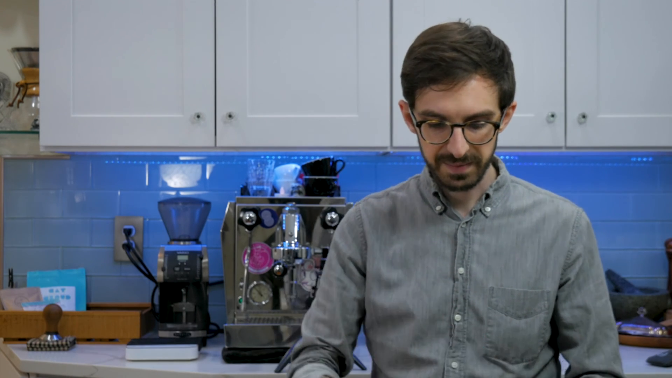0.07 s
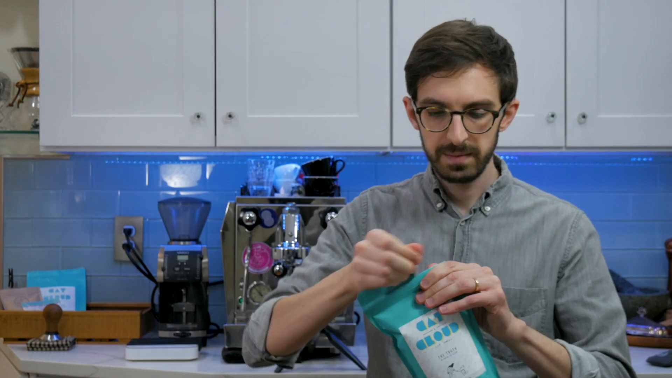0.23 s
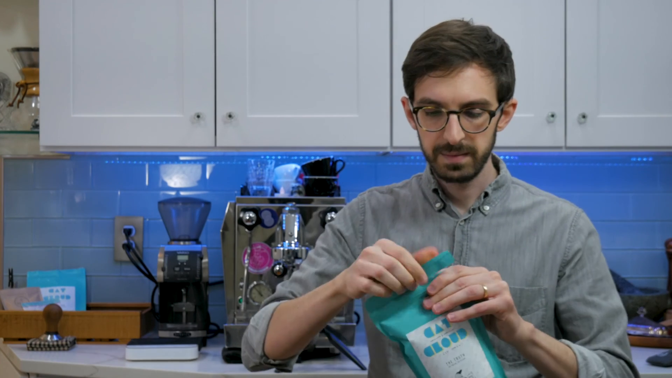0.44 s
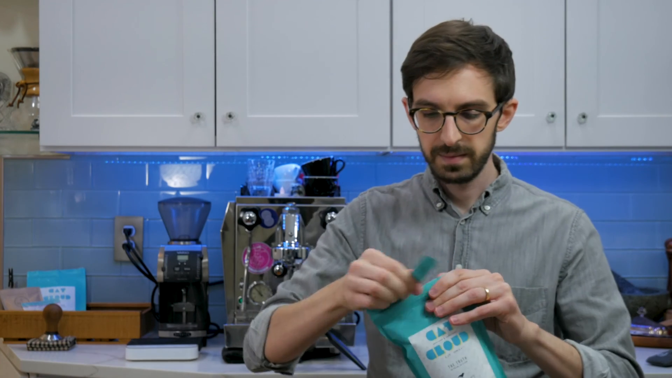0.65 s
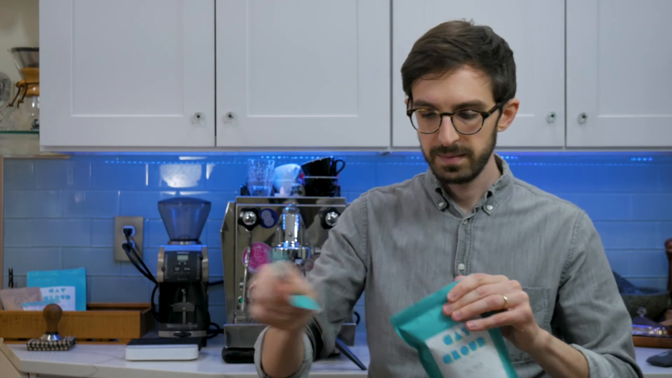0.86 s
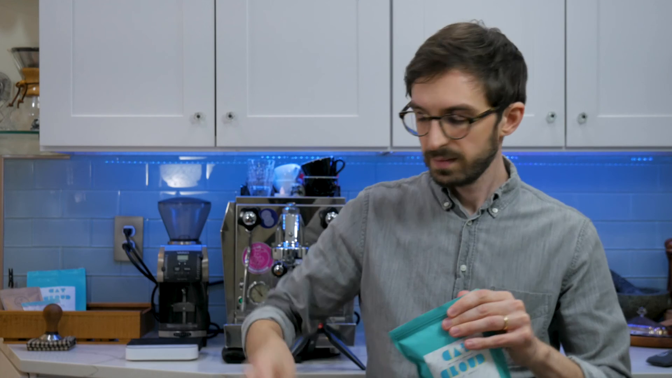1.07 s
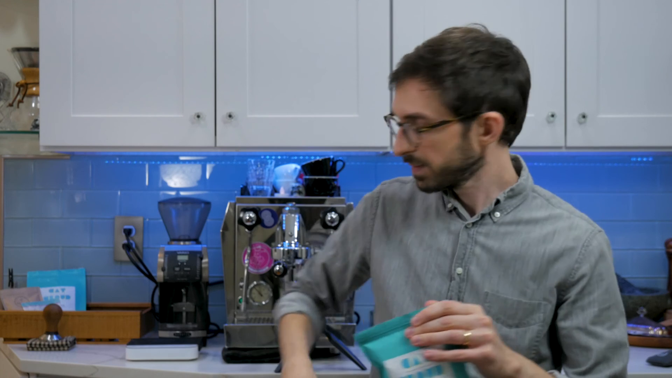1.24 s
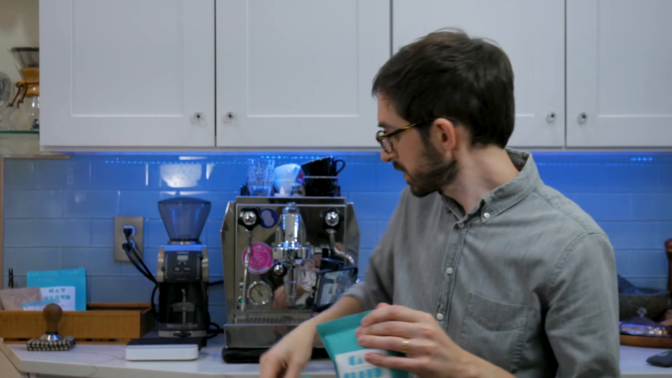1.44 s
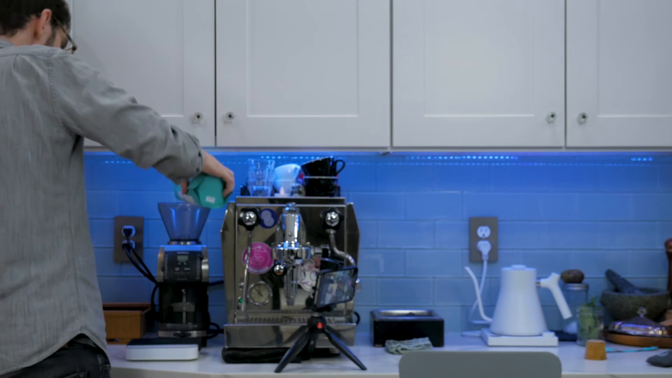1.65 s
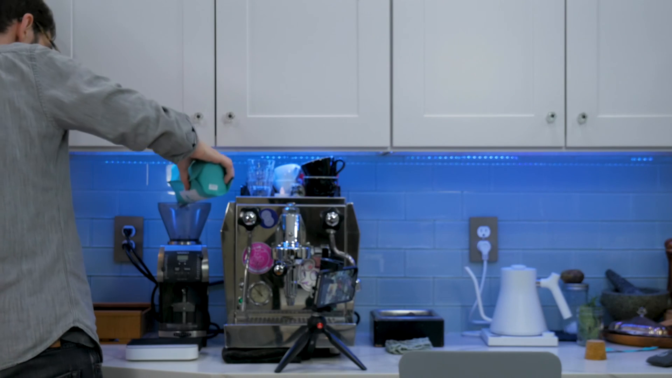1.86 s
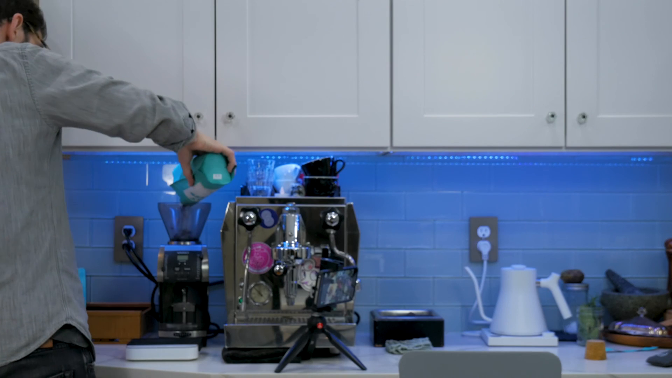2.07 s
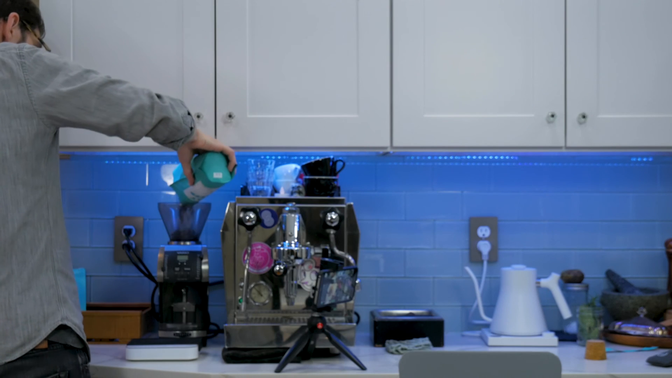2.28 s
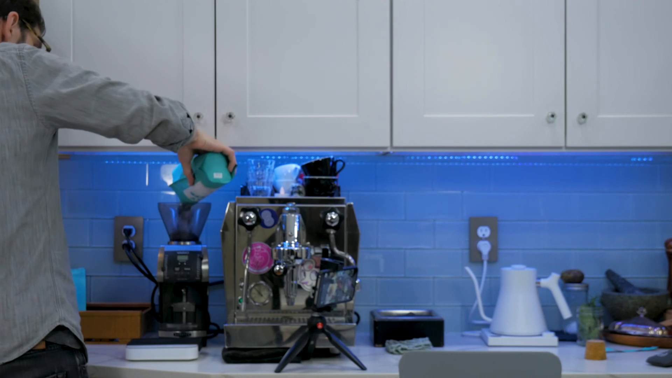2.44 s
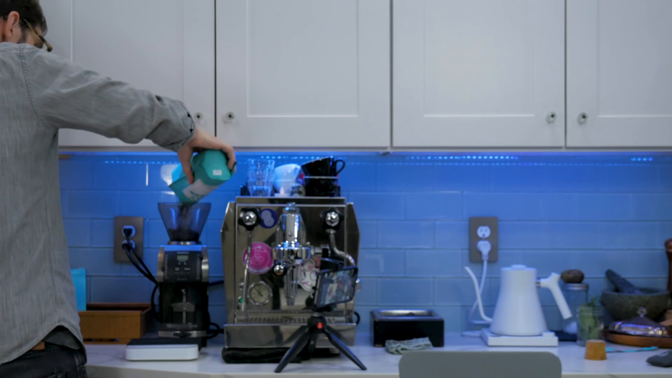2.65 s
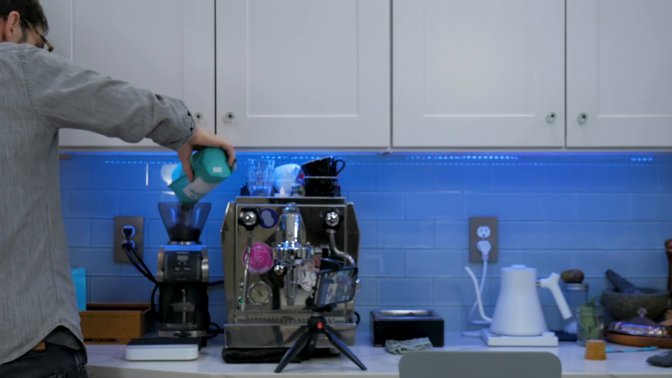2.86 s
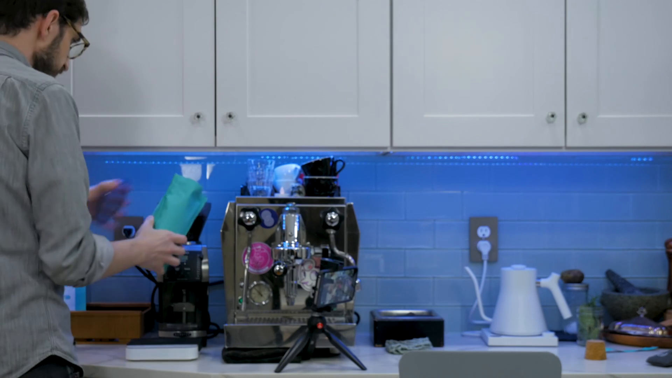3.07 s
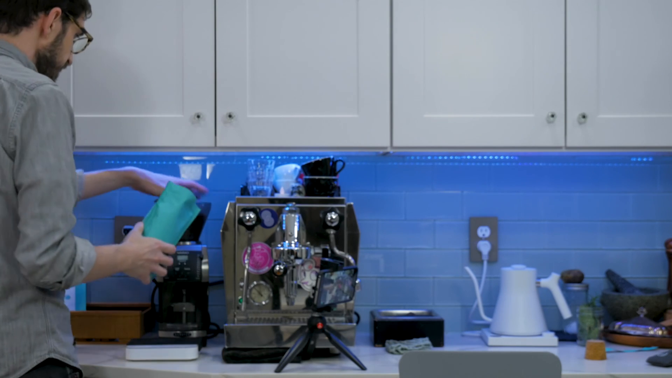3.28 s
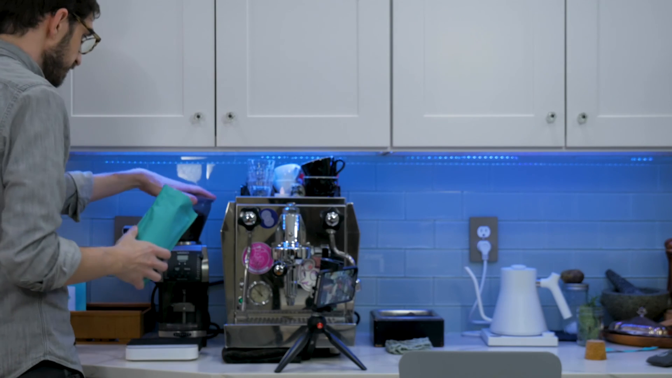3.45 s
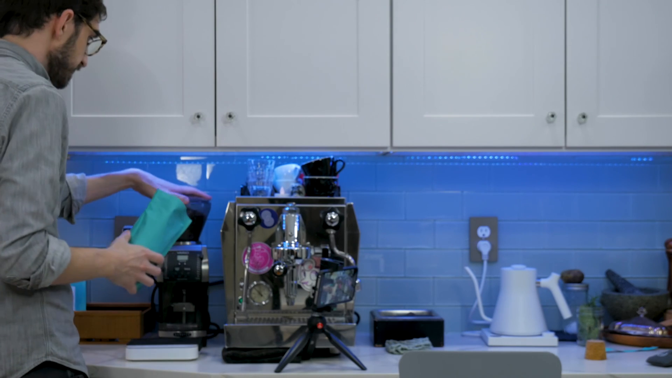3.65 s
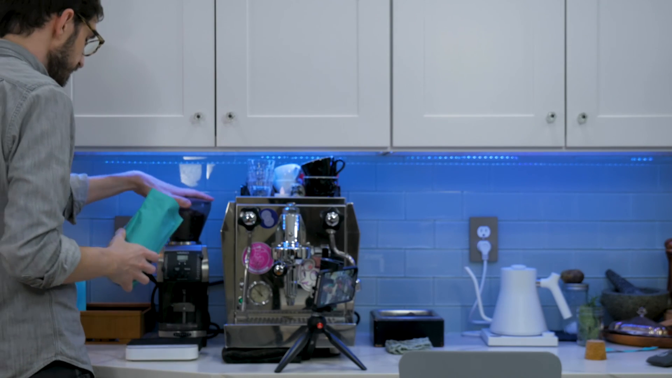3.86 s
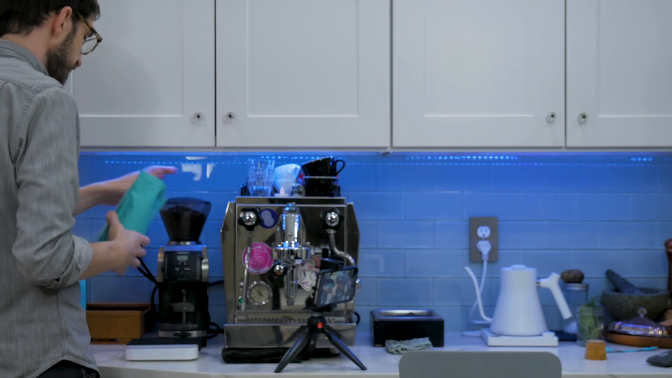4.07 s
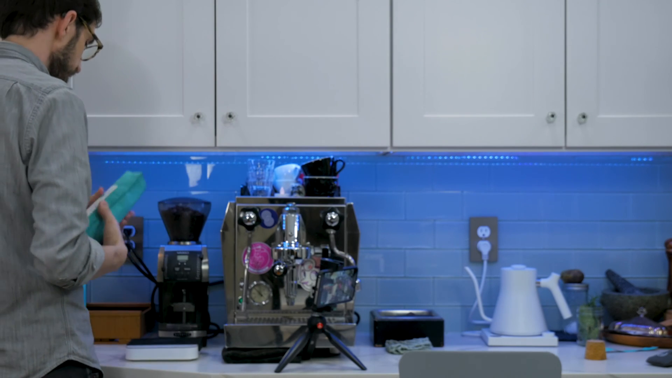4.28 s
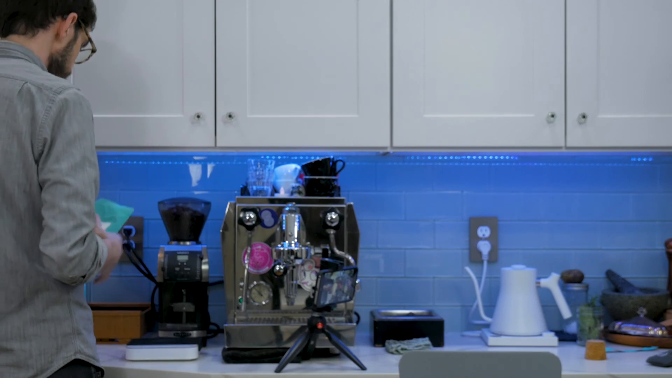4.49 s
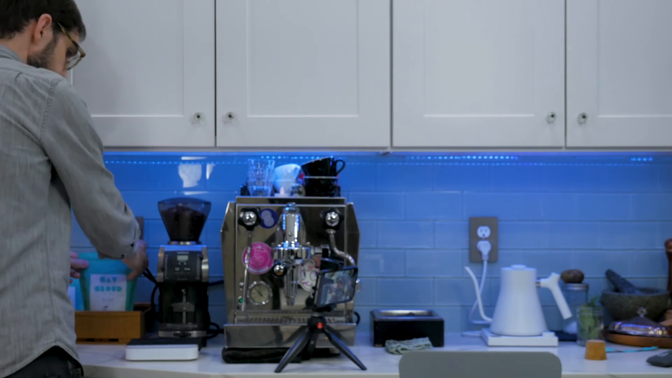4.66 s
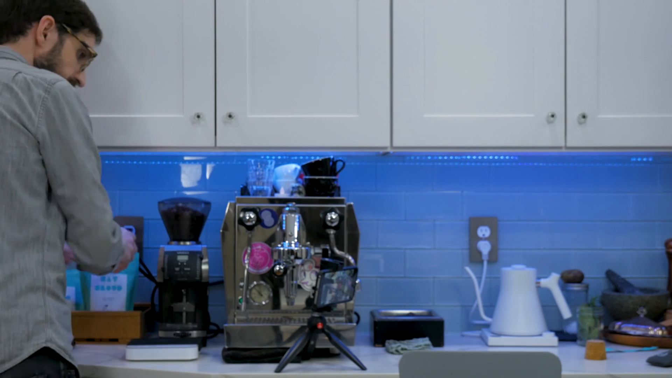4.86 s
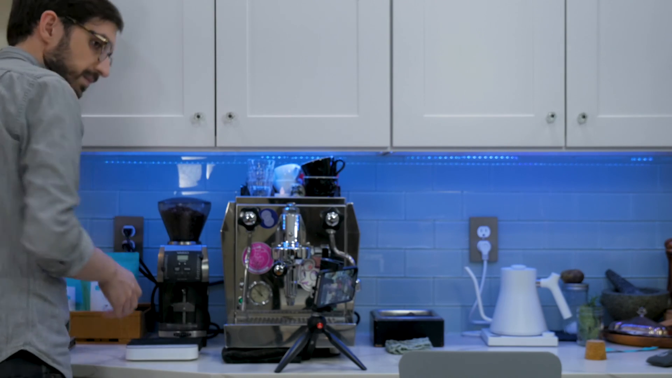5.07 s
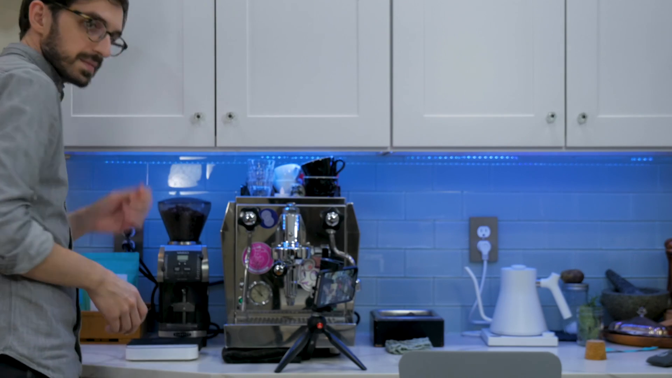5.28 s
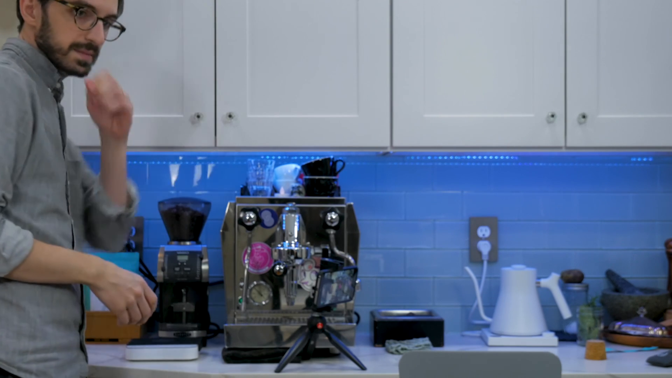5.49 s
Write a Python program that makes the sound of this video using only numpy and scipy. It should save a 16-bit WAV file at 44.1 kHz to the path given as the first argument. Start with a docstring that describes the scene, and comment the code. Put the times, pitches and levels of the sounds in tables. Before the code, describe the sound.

A paper bag is rustled and torn open, then coffee beans rush ringing into a hard grinder hopper before the bag is shaken and crumpled.

```python
"""A paper bag of coffee beans is torn open in a small kitchen, tipped, then shaken, crumpled and set down.
The bag is random grain clicks rung through its resonances; its snaps are short ringing noise bursts.
The beans rush into a hard ringing hopper: clicks strike resolved modes and a wash of unresolved ones.
Dull knocks, and a pulsed squeak near 1.5 kHz, are single decaying modes. Behind it all lie a short room
tail, quiet room tone and preamp hiss; the sound is mono but for the hiss and a faint flickering side."""
import sys
import numpy as np
from scipy import signal
from scipy.fft import rfft, irfft
from scipy.io import wavfile

SR = 44100
rng = np.random.default_rng(int(sys.argv[2]) if len(sys.argv) > 2 else 0)


def ratio_of_db(decibels):
    """Turn decibels (scalar or array-like) into linear amplitude factors; 0 dB maps to 1."""
    return 10 ** (np.asarray(decibels, float) / 20)


def wrap_up_sound(samples):
    """Save the sound to the file named by the first command line argument, as 16-bit audio."""
    columns = np.atleast_2d(samples).T
    # keep every value between -1 and 1, then stretch to whole-number steps
    tamed = np.clip(columns, -1, 1)
    steps = np.round(tamed * 32767).astype(np.int16)
    wavfile.write(sys.argv[1], SR, steps)


N = 243652
TIME_S = np.arange(N) / SR


def rms_one(x):
    """Scales a signal to rms 1."""
    return x / np.sqrt(np.mean(x ** 2) + 1e-20)


def in_time(rows):
    """Table columns per sample; silent outside the table."""
    s, *columns = np.transpose(rows)
    return [np.interp(TIME_S, s, column, left=-200, right=-200) for column in columns]


def spells(rows):
    """Body and crackle level in dB: each spell rises, holds and is released; the loudest one counts."""
    rise_db, release_db_per_s = 27, 153
    crackle_steeper = 1.73   # the crackle climbs and falls faster than the body
    s, rise, hold, body_db, crackle_db = np.transpose(rows)[:, :, None]
    t = np.arange(0, N + 64, 64) / SR
    rising_db = rise_db * np.maximum(s - t, 0) / np.maximum(rise, 1e-3)
    falling_db = release_db_per_s * np.maximum(t - s - hold, 0)
    below_db = rising_db + falling_db
    levels = (body_db - below_db, crackle_db - crackle_steeper * below_db)
    return [np.interp(TIME_S, t, np.maximum(db.max(axis=0), -200)) for db in levels]


def drift(steps_per_s):
    """Slow random wander around zero, spread about 1."""
    steps = np.arange(N) * steps_per_s / SR
    count = int(steps[-1]) + 2
    return np.interp(steps, np.arange(count), 1.2 * rng.standard_normal(count))


def colour(x, spectrum):
    """Causal (minimum-phase) filter that follows a (Hz, dB) table."""
    hz, db = np.transpose(spectrum)
    grid = np.maximum(np.fft.rfftfreq(4096, 1 / SR), 1)
    cepstrum = irfft(np.interp(np.log(grid), np.log(hz), db) * np.log(10) / 20)
    cepstrum[1:2048] *= 2   # folding the cepstrum makes the phase minimum
    cepstrum[2049:] = 0
    return signal.oaconvolve(x, irfft(np.exp(rfft(cepstrum))))[:N]


def resonance(x, hz, width_hz):
    """Two-pole band-pass, gain 1 on top."""
    r = np.exp(-np.pi * width_hz / SR)
    poles = [1, -2 * r * np.cos(2 * np.pi * hz / SR), r * r]
    return signal.lfilter([(1 - r * r) / 2, 0, (r * r - 1) / 2], poles, x + 1e-18)


def grains(per_s, spread_db, clump_db):
    """Random clicks of uneven size, arriving in clumps of a few ms; mean power about 1."""
    knots = N // 256 + 2
    clumps = np.interp(np.arange(N) / 256, np.arange(knots), rng.standard_normal(knots))
    born = rng.random(N) < per_s / SR
    size_db = spread_db * np.minimum(rng.exponential(1, N), 5) + clump_db * clumps
    sizes = ratio_of_db(size_db) * rng.choice([-1, 1], N)
    return rms_one(sizes) * born / np.sqrt(np.clip(per_s / SR, 1e-4, 1))


def struck(clicks, modes, patchy_db, damping_db=0):
    """Each click meets each mode with its own strength; modes swell and fade as the contact moves."""
    out = 0
    for hz, width, db in modes:
        strength = rng.uniform(.3, 1.7, N) * rng.choice([-1, 1], N)
        gain_db = db + patchy_db * drift(18) + damping_db * 3300 / hz   # low modes damped most
        push = clicks * strength * ratio_of_db(gain_db)
        # a double resonance keeps the valleys dark
        out = out + resonance(resonance(push, hz, width), hz, 3.4 * width)
    return out


# Dull colour of grains against the paper wall, before scaling: f/Hz, level/dB
BAG_BODY = [(71, -54.5), (120, -18), (186, -16.5), (272, -22.5), (317, -12), (729, -0.5), (811, 0),
            (2210, -7.5), (4500, -18.5), (5850, -24.5), (9900, -120)]
# Bright colour of the same contacts, before scaling: f/Hz, level/dB
BAG_CRACKLE = [(1470, -37), (2500, -4.5), (4740, -1), (6510, 0.5), (8790, -1), (10700, -11.5),
               (13800, -12.5), (15800, -27.5)]


def bag(levels, modes, ring_db, clicks, patchy_db):
    """Grains in the bag wall: a dull body with its resonances, and a bright crackle of the same contacts."""
    body_db, crackle_db = levels
    ring = rms_one(struck(clicks, modes, patchy_db))
    body = rms_one(colour(clicks, BAG_BODY)) + ratio_of_db(ring_db) * ring
    crackle = rms_one(colour(clicks, BAG_CRACKLE))
    return ratio_of_db(body_db) * rms_one(body) + ratio_of_db(crackle_db) * crackle


# Spells of grains in the bag, the last ones paper crumpled in the hands:
# full level at t/s, rise t/s, hold t/s, body level/dB, crackle level/dB
HANDLING = [(0.0, .01, 0.075, -53, -52), (0.101, 0.034, 0.0084, -32.5, -41.5),
            (0.19, .05, 0.098, -56, -53.5), (0.286, 0.019, 0.012, -37.5, -41),
            (0.315, .01, 0.023, -36, -44.5), (0.365, .008, 0.014, -41, -49),
            (0.496, 0.014, 0.018, -46, -51.5), (0.56, .03, 0.13, -55.5, -59),
            (1.15, 0.057, 0.0053, -65, -57.5), (1.23, 0.089, 0.009, -71, -65.5),
            (1.39, 0.13, 0.049, -65.5, -65.5), (1.44, .01, 0.034, -58.5, -70),
            (1.6, 0.58, 0.034, -57.5, -63.5), (3.093, 0.0042, 0.089, -42, -48.5),
            (3.796, 0.019, .01, -33.5, -48), (3.812, 0.0081, 0.0017, -34, -41),
            (3.878, 0.014, 0.0017, -29, -32.5), (4.37, 0.33, 0.011, -48, -57.5),
            (4.38, .003, 0.004, -42.5, -39.5), (4.408, 0.0035, 0.011, -33, -44),
            (4.424, 0.004, 0.01, -39, -33), (4.471, 0.0092, 0.029, -31, -37.5),
            (4.555, .006, 0.027, -36.5, -42), (4.989, 0.0078, 0.0069, -52, -53),
            (5.26, 0.087, 0.032, -57.5, -98), (5.52, 0.18, .01, -57, -85)]
# The top of the bag ripped off: t/s, body level/dB, crackle level/dB
TEARING = [(0.762, -48, -62), (0.772, -32.5, -41.5), (0.85, -33.5, -44.5), (0.925, -37, -50),
           (0.945, -58, -61), (1.09, -64, -73)]


def handled_bag():
    """Handling, tearing and crumpling: clumped grains ring the facets of creased paper."""
    facets = [(hz, 0.23 * hz, -1.5 * np.log2(hz / 400)) for hz in np.geomspace(270, 2100, num=10)]
    folds = grains(4500, spread_db=2.6, clump_db=1.9)
    levels = np.maximum(spells(HANDLING), in_time(TEARING))
    return bag(levels, facets, ring_db=1.0, clicks=folds, patchy_db=6.5)


# Beans sliding in the tipped bag: t/s, body level/dB, crackle level/dB
SLIDING = [(1.632, -44.5, -50.5), (1.709, -39.5, -46), (2.035, -43, -52.5), (2.177, -38, -41.5),
           (2.649, -37, -43.5), (2.893, -40.5, -42.5), (3.093, -39, -32.5)]
# Resonances of the tipped bag: f/Hz, width f/Hz, relative level/dB
TIPPED_BAG = [(706.5, 41, 6), (992, 94, 5), (1280, 97, 4), (1804, 400, -0.5), (3000, 320, -5.5)]


def tipped_bag():
    """Beans sliding down the tipped bag: dense grains ring the paper steadily."""
    beans = grains(5000, spread_db=-1.0, clump_db=0.0)
    return bag(in_time(SLIDING), TIPPED_BAG, ring_db=0.71, clicks=beans, patchy_db=0.5)


# Beans heard singly: t/s, click level/dB before the wall's gain, hardest-rung mode f/Hz, its level/dB
SINGLE_BEANS = [(1.931, 0, 3310, -27.5), (1.951, -4.5, 3310, -19), (1.9806, -4.5, 6925, -33.5),
                (2.0039, 3, 2770, -26.5), (2.0536, -3.5, 3310, -27.5), (2.0717, -7.5, 3310, -23),
                (2.089, 1, 3310, -16), (2.876, -5, 3310, -22.5), (2.9792, -2, 3310, -30.5)]


def favoured_modes():
    """Where a lone bean lands, one mode of the wall rings out above the others."""
    out, t = np.zeros(N), np.arange(SR // 5) / SR
    for s, _, hz, ring_db in SINGLE_BEANS:
        t60_s = 0.12 * 3310 / hz   # higher modes die sooner
        at = round(s * SR)
        out[at:at + len(t)] += ratio_of_db(ring_db - 60 * t / t60_s) * np.sin(2 * np.pi * hz * t)
    return out


# Stream striking the hopper, before the wall's gain: t/s, level/dB
STREAM = [(1.935, -37.5), (2.04, -34.5), (2.052, -33), (2.06, -27.5), (2.095, -27), (2.118, -25),
          (2.148, -24), (2.54, -23), (2.794, -24.5), (3.068, -33), (3.093, -35)]
# The rising heap damps the wall: t/s, level/dB at 3.3 kHz
HEAP = [(2.12, -1), (2.3, 0.5), (2.55, -0.5), (2.752, -4.5), (2.9, -9), (3.09, -20)]
# Resolved modes of the hopper wall: f/Hz, width f/Hz, relative level/dB
HOPPER = [(1402, 43, -11), (2345, 26, -10), (2770, 23, -6), (3182, 48, -9), (3310, 52, -1.5),
          (3460, 35, -10), (3480, 45, -8), (3970, 25, -9.5), (4684, 150, -14), (4775, 48, -8.5),
          (5270, 28, -7), (6890, 48, -12), (8620, 530, -12.5), (9840, 81, -17)]
# Its dense, unresolved upper modes: f/Hz, relative level/dB
HOPPER_WASH = [(880, -43), (1500, -14), (1860, -46), (2380, -17), (2580, -21.5), (3300, -1), (3790, -12),
               (4750, -7.5), (8490, -9.5), (14300, -21), (15800, -29)]


def hopper():
    """Single beans and a dense stream ring one wall; the rush is cut off dead at an edit."""
    clicks = ratio_of_db(in_time(STREAM)[0]) * grains(1600, spread_db=2.5, clump_db=-0.1)
    for s, click_db, *_ in SINGLE_BEANS:
        clicks[round(s * SR)] += ratio_of_db(click_db)
    heap_db = np.interp(TIME_S, *np.transpose(HEAP))
    # gain set from the wall's answer to a steady random push
    ring_gain = ratio_of_db(-1.0) / np.std(struck(np.ones(N), HOPPER, patchy_db=2.5))
    ring = ring_gain * struck(clicks, HOPPER, patchy_db=2.0, damping_db=heap_db)
    # unresolved modes: noise whose power jumps at each click and dies away, plus the bare tick
    keep = ratio_of_db(-120 / (0.08 * SR))
    dying_power = signal.lfilter([1 - keep], [1, -keep], clicks ** 2)
    dying = np.sqrt(dying_power) * rng.standard_normal(N) + 0.27 * clicks
    wash_gain = ratio_of_db(-0.5) / np.std(colour(rng.standard_normal(N), HOPPER_WASH))
    wash = wash_gain * colour(dying, HOPPER_WASH)
    before_cut = np.arange(N) < STREAM[-1][0] * SR
    return kitchen(ring + wash + favoured_modes(), wet_db=-1.5) * before_cut


# Last beans shaken loose: full level at t/s, rise t/s, hold t/s, body level/dB, crackle level/dB
SHAKING = [(3.391, 0.0041, 0.0033, -33, -43.5), (3.438, 0.0054, 0.032, -24.5, -41),
           (3.56, 0.044, 0.012, -33, -53.5), (3.635, 0.15, 0.015, -30.5, -44)]
# Resonances of the shaken bag: f/Hz, width f/Hz, relative level/dB
SHAKEN_BAG = [(527, 72, 3.5), (815, 43, -2.5), (1123, 95, 1), (1453, 60, -4), (1915, 100, 0),
              (2365, 73, -6.5), (3450, 310, -9)]


def shaken_bag():
    """The last beans shaken loose: sparser grains ring the bag hard and patchily."""
    beans = grains(2500, spread_db=1.0, clump_db=0.0)
    return bag(spells(SHAKING), SHAKEN_BAG, ring_db=4.0, clicks=beans, patchy_db=5.0)


# Paper snaps and ticks: t/s, peak level/dB of the pop, centre f/Hz, treble tick level/dB re that peak
SNAPS = [(0.033, -36.5, 380, -21), (0.087, -26, 1510, -25), (0.104, -20, 1270, -20),
         (0.11, -25.5, 436, -30), (0.123, -22.5, 860, -0.5), (0.288, -34, 1460, 0), (0.314, -32, 1380, -27),
         (0.342, -23, 1290, -18), (0.379, -19, 1190, -30), (0.502, -41, 700, -20), (0.514, -36, 1800, 6.5),
         (0.527, -31, 366, -2), (0.588, -31, 316, -4), (0.62, -39, 550, 12.5), (0.691, -35.5, 2280, -6),
         (0.77, -21, 1490, -9), (0.796, -20.5, 830, 2.5), (0.902, -24.5, 1030, -28),
         (1.035, -42, 2200, -22), (1.427, -22.5, 800, -21.5), (3.391, -23, 1930, -8),
         (3.437, -18, 1070, -7), (3.81, -23, 430, 0), (3.878, -17.5, 960, -2.5), (4.341, -37.5, 990, -12),
         (4.379, -32.5, 1180, -6), (4.407, -24, 1140, -22), (4.4241, -19.5, 2600, -1),
         (4.471, -17.5, 676, -4), (4.554, -17.5, 2030, -18), (4.635, -30, 546, -25),
         (5.045, -41, 1298, -24.5), (5.277, -40.5, 1170, -18.5)]


def snaps():
    """A buckling fold: a short noisy push ringing around its centre, with a sharper treble tick."""
    out, t = np.zeros(N), np.arange(1000) / SR
    noise = rng.standard_normal((len(SNAPS), 2, len(t)))
    treble = signal.butter(3, [2200, 10500], "band", fs=SR, output="sos")
    for (s, peak_db, hz, treble_db), (dull, sharp) in zip(SNAPS, noise):
        push = dull * ratio_of_db(-60 * t / 0.011)
        pop = resonance(resonance(push, hz, 0.65 * hz), hz, 2.0 * hz)
        pop = signal.sosfilt(signal.butter(2, 4.9 * hz, fs=SR, output="sos"), pop)
        tick = signal.sosfilt(treble, sharp * ratio_of_db(-60 * t / 0.015))
        burst = pop / np.abs(pop).max() + ratio_of_db(treble_db) * tick / np.abs(tick).max()
        at = round(s * SR)
        out[at:at + len(t)] += ratio_of_db(peak_db) * burst
    return out


# Bag set down: full level at t/s, rise t/s, hold t/s, body level/dB, crackle level/dB
SETTLING = [(4.636, 0.017, 0.0061, -34, -46.5), (4.76, 0.18, 0.0056, -43, -56.5)]
# Resonances of the bag as it is set down: f/Hz, width f/Hz, relative level/dB
SET_DOWN_BAG = [(494, 130, 2), (1106, 120, 1.5), (1490, 160, -2.5)]


def set_down_bag():
    """The bag set down: a brief settling of grains rings its broad resonances."""
    settling = grains(3300, spread_db=2.0, clump_db=-0.5)
    return bag(spells(SETTLING), SET_DOWN_BAG, ring_db=2.3, clicks=settling, patchy_db=-0.5)


# Knocks, most of them low in the counter, and last a pulsed squeak near 1.5 kHz:
# t/s, level/dB before onset and low cut, f/Hz, t60 t/s
KNOCKS_AND_SQUEAK = [(0.104, -28, 274, 0.07), (0.59, -18, 318, 0.015), (0.784, -30, 260, 0.046),
                     (0.822, -21.5, 657, 0.083), (1.51, -18, 102, 0.13), (1.552, -21, 82, 0.057),
                     (1.599, -31, 83, 0.081), (3.104, -37.5, 469, 0.26), (3.434, -31, 159, 0.12),
                     (3.462, -26, 774, 0.098), (3.58, -25.5, 840, 0.12), (3.499, -43, 79, 0.24),
                     (3.625, -30.5, 1915, 0.3), (3.878, -12.5, 171.5, 0.052), (3.923, -21, 188, 0.038),
                     (3.958, -28.5, 170, 0.067), (4.038, -33.5, 397, 0.058), (4.768, -33.5, 1427, 0.073),
                     (4.802, -45, 1502, 0.15), (4.83, -53.5, 1530, 0.42)]


def knocks_and_squeak():
    """Each knock or squeak pulse sets one mode ringing softly; a dull rattle roughens the ring."""
    out, t = np.zeros(N), np.arange(SR // 3) / SR
    for s, level_db, hz, t60 in KNOCKS_AND_SQUEAK:
        noise = rng.standard_normal(len(t))
        rattle = 0.1 * rms_one(resonance(resonance(noise, 0.54 * hz, 1.4 * hz), 0.63 * hz, 1.3 * hz))
        onset = 1 - np.exp(-t * hz)
        ring = ratio_of_db(level_db - 60 * t / t60) * (np.sin(2 * np.pi * hz * t) + rattle) * onset
        low_cut = signal.butter(2, 0.49 * hz, "high", fs=SR, output="sos")
        at = round(s * SR)
        out[at:at + len(t)] += signal.sosfilt(low_cut, ring)
    return out


def kitchen(x, wet_db=0.):
    """The small room behind the source: a dense tail of dull and bright noise, each with its own decay."""
    dull_t60_s, bright_t60_s, room_db = 0.25, 1.9 * 0.25, -10.5
    t = np.arange(SR // 2) / SR
    noise = rng.standard_normal(len(t))
    dull = signal.lfilter([.3], [1, -.7], noise)
    tail = dull * ratio_of_db(-60 * t / dull_t60_s) + 1.8 * noise * ratio_of_db(-60 * t / bright_t60_s)
    tail = tail * (t > .004)   # a gap after the direct sound
    return x + ratio_of_db(room_db + wet_db) * signal.oaconvolve(x, tail / np.linalg.norm(tail))[:N]


# Colour of the quiet kitchen, before scaling: f/Hz, level/dB
ROOM_TONE = [(15, -48), (25, -5.5), (55, -14.5), (126, -6), (141, -19.5), (222, 2.5), (269, -15),
             (361, -11.5), (392, -5.5), (637, -14), (710, -32), (929, -14.5), (4100, -35), (8490, -34),
             (15800, -41.5)]


def room_tone():
    """Steady background of the kitchen: coloured noise at -61 dB rms."""
    return ratio_of_db(-61) * rms_one(colour(rng.standard_normal(N), ROOM_TONE))


def scene():
    """Bag and snaps share the room tail, the hopper has a drier one; the other sounds have none."""
    bags = handled_bag() + tipped_bag() + shaken_bag() + set_down_bag()
    heard = kitchen(bags + snaps()) + hopper() + knocks_and_squeak() + room_tone()
    return np.array([heard, heard])


def low_pass(x):
    """Removes everything above the highest recorded frequency."""
    return signal.sosfilt(signal.butter(12, 16460, fs=SR, output="sos"), x)


def record(dry):
    """Mono sound with a faint, flickering side noise, hiss of each channel's own and a top cut."""
    scramble = rng.standard_normal(600) * ratio_of_db(-60 * np.arange(600) / 600)
    scrambled = signal.oaconvolve(dry[0], scramble / np.linalg.norm(scramble))[:N]
    bright = signal.lfilter([1, -.55], [1], scrambled)
    bright = signal.sosfilt(signal.butter(1, 230, "high", fs=SR, output="sos"), bright)
    flicker = ratio_of_db(-21 + 4.0 * drift(30)) * drift(12)
    side = flicker * bright * [[1], [-1]]   # opposite sign in the two channels
    # preamp hiss, -75 dB before its low-pass
    hiss = ratio_of_db(-75) * signal.lfilter([.45], [1, -.65], rng.standard_normal(dry.shape))
    top_cut = signal.cheby2(12, 60, 16700, fs=SR, output="sos")   # 60 dB down from 16.7 kHz
    mix = signal.sosfilt(top_cut, dry + side + hiss)
    return low_pass(mix)


dry = scene()
out = record(dry)
wrap_up_sound(out)
```